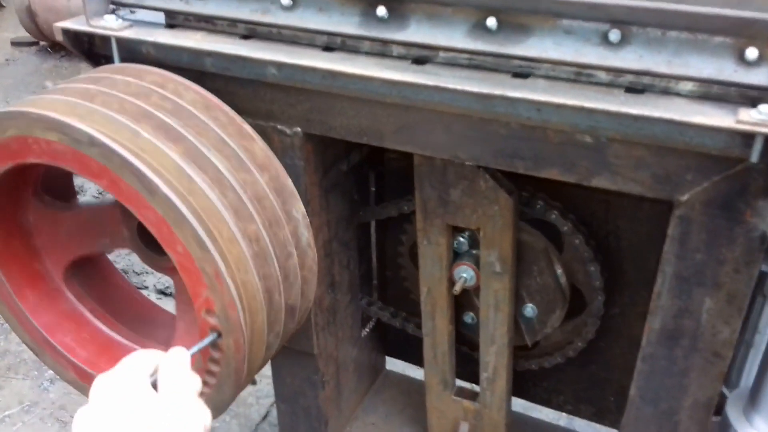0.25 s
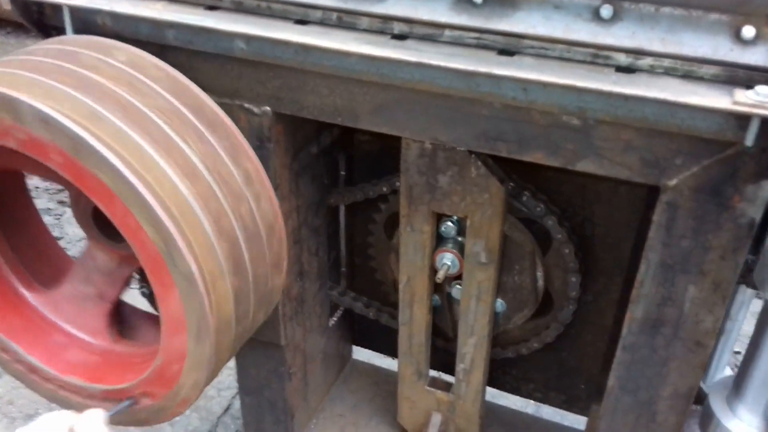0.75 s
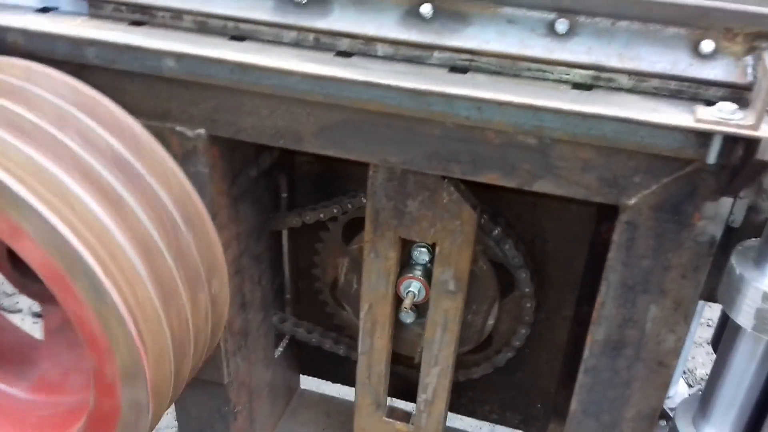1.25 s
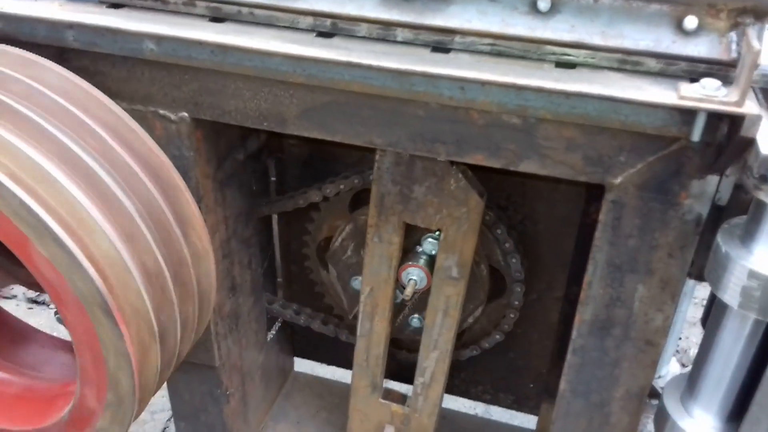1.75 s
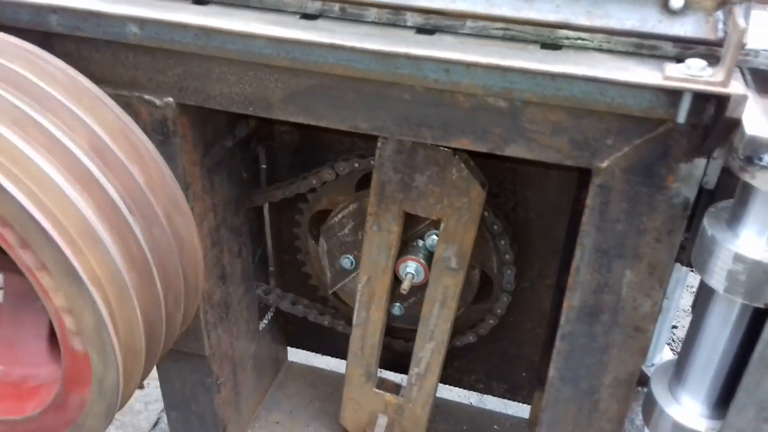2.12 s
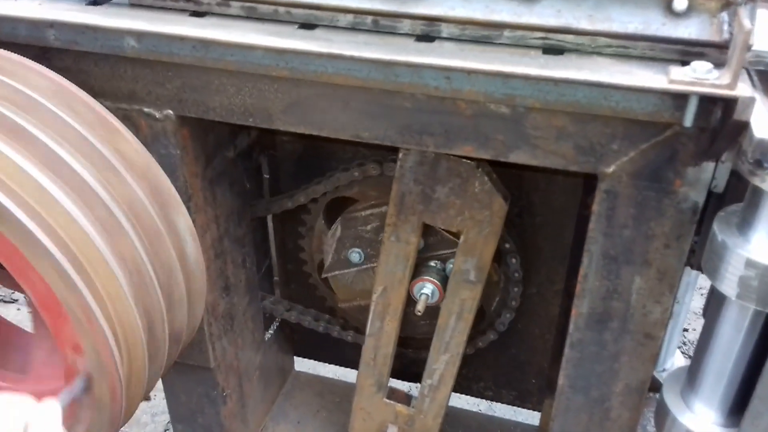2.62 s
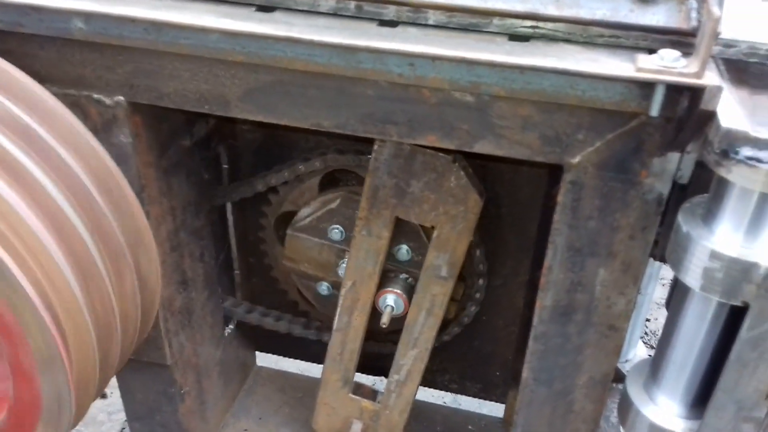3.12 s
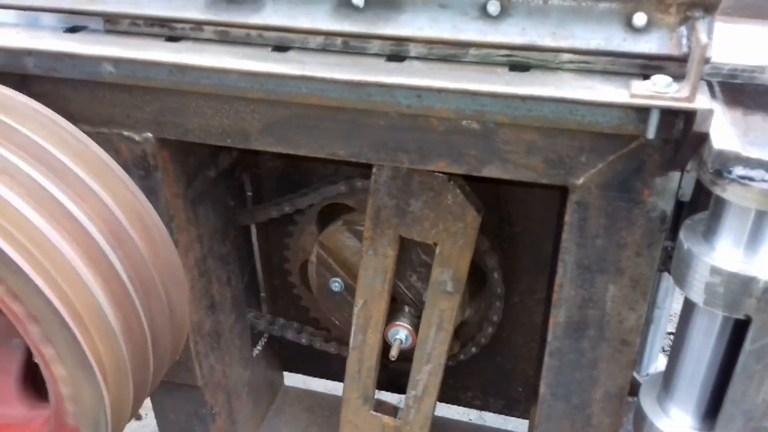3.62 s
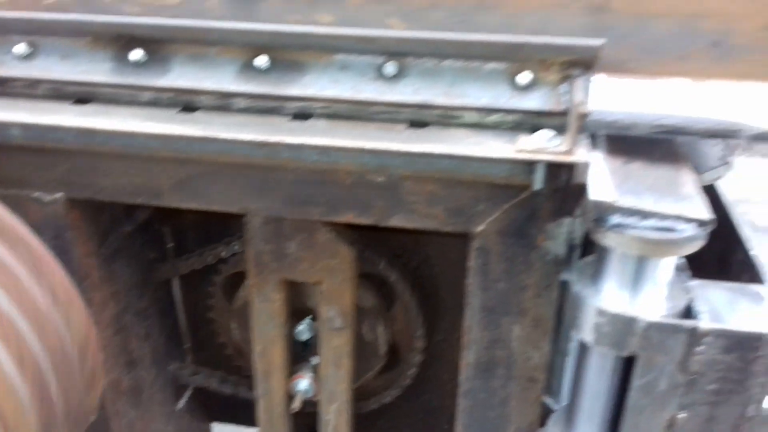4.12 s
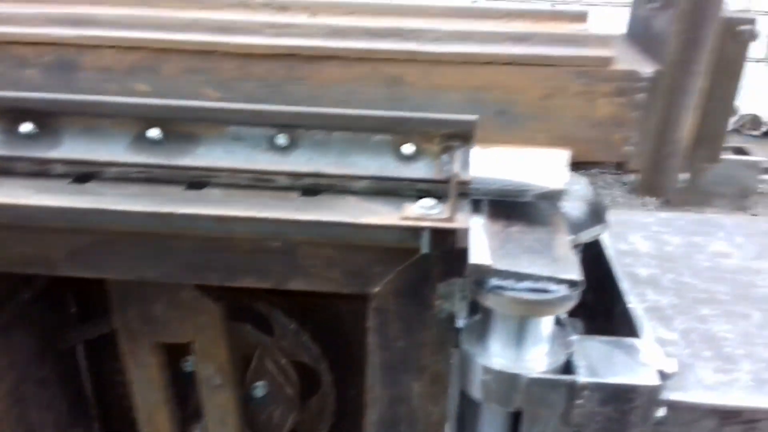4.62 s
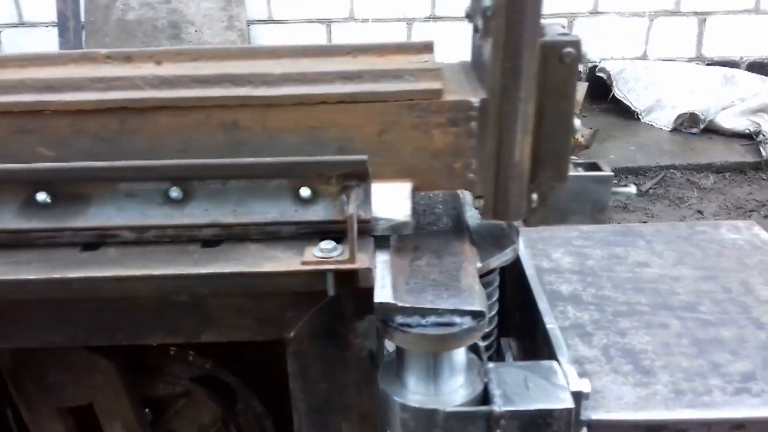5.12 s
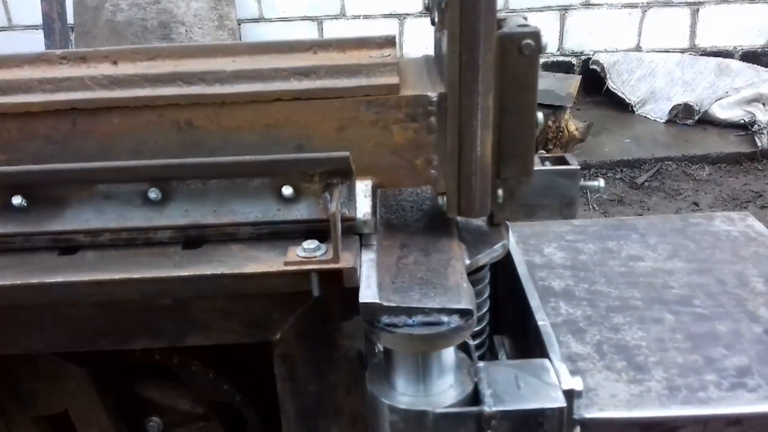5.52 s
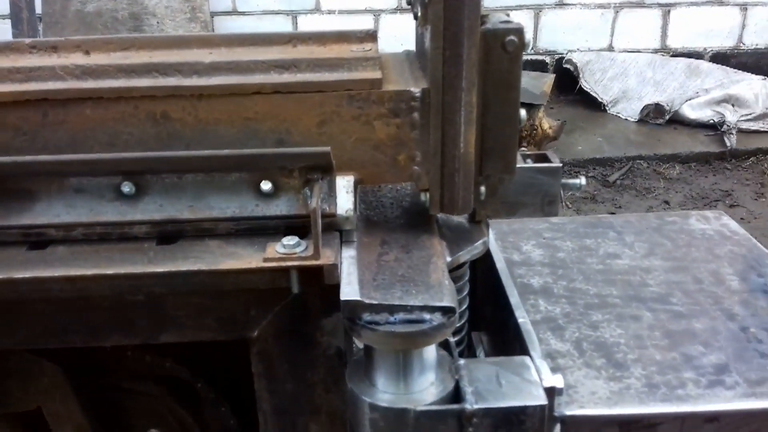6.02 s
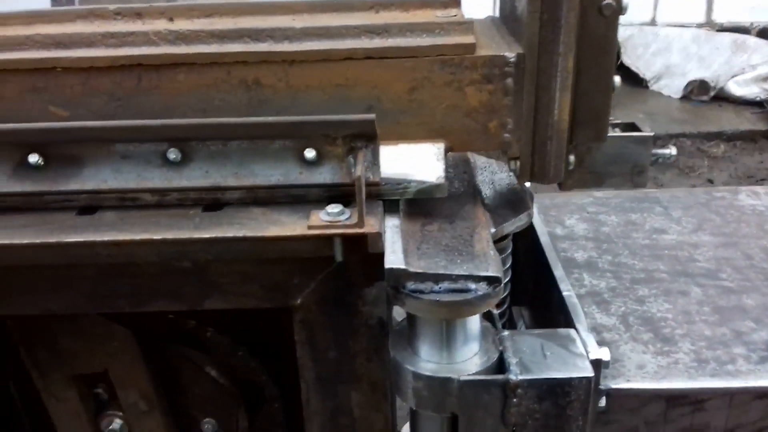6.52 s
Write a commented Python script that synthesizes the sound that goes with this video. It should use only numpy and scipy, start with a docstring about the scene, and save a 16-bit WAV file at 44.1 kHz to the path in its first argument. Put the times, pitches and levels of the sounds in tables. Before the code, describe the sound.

A hand-turned metal shaper in an open yard, heard close through a small, mid-range, essentially mono microphone. From 0 to 1 s there is only faint dry rasp, tiny knocks and light hiss. From 1 to 2.5 s chain and arm clacks become firmer and more frequent, and the hiss rises. At about 2.67 s a hard double knock with a dull low thud lands as the steel slide swells; grainy, ringing scraping continues with strong clacks near 2.9 and 3.05 s and very faint squeals until about 4.4 s. The scrape thins, almost stopping near 5.05 s, where a loose bar pings softly at 5.08 s. Quick dry ticks follow and scraping rebuilds. At 5.9 s one extremely loud, very short snap cracks, its pitch falling instantly. Scraping and spaced knocks continue to the cut at about 6.8 s, with slight wind bumps underneath.

```python
"""First heard is a faint dry rasp with soft knocks over hiss: a hand-turned metal shaper at work in a yard.
The ram slides on steel ways (noise of many small catches through resonators), chain rollers and the slotted
arm knock on the welded frame (short bursts exciting modes), and the base gives a few low, dull thuds.
Once a loose bar pings (decaying sines) and once the slack snaps tight (a falling pulse in a noise burst).
Faint squeals, wind and hiss lie behind, heard by a small mono microphone with a narrow mid-range voice."""
import sys
import numpy as np
from scipy import signal
from scipy.fft import rfft, irfft
from scipy.io import wavfile
from scipy.ndimage import uniform_filter1d

SR = 44100
rng = np.random.default_rng(int(sys.argv[2]) if len(sys.argv) > 2 else 0)


def master(y):
    """Save y as 16-bit WAV."""
    cut = np.clip(np.atleast_2d(y).T, -1, 1)
    pcm = np.round(cut * 32767)  # scale
    wavfile.write(sys.argv[1], SR, pcm.astype(np.int16))


N = 297979


def from_db(db):
    """Amplitude ratio: 20 dB is a factor of ten."""
    return 10 ** (np.asarray(db) / 20)


def rms_one(x):
    """Normalisation to unit root-mean-square amplitude."""
    return x / np.sqrt(np.mean(x ** 2) + 1e-20)


def in_time(rows):
    """Linear interpolation: each column of a curve table at every sample."""
    s, *columns = np.transpose(rows)
    return [np.interp(np.arange(N) / SR, s, column) for column in columns]


def drift(rate_hz):
    """Low-pass random fluctuation of unit rms, computed at every 40th sample and interpolated."""
    pole = np.exp(-80 * np.pi * rate_hz / SR)
    noise = rng.standard_normal(N // 40 + 2002)
    slow = signal.lfilter([1], [1, -2 * pole, pole * pole], noise)[2000:]   # drop the settling
    return np.interp(np.arange(N) / 40, np.arange(len(slow)), rms_one(slow))


def band(x, order, edges_hz, kind="low"):
    """Butterworth filtering: maximally flat in its passband."""
    return signal.sosfilt(signal.butter(order, edges_hz, kind, fs=SR, output="sos"), x)


def colour(x, spectrum, size=4096):
    """Minimum-phase filtering: the given spectrum with its energy as early as possible, at unit power."""
    hz, db = np.transpose(spectrum)
    bins_hz = np.arange(size // 2 + 1) * SR / size
    log_gain = np.log(from_db(np.interp(np.log(bins_hz + 1), np.log(hz), db)))
    cepstrum = irfft(log_gain)
    cepstrum[1:size // 2] *= 2   # folding the cepstrum makes the response causal
    cepstrum[size // 2 + 1:] = 0
    response = irfft(np.exp(rfft(cepstrum)))
    response = response / np.sqrt(np.sum(response ** 2))
    return signal.oaconvolve(np.atleast_2d(x), response[None], axes=1)[:, :np.shape(x)[-1]]


def ring(force, hz, t60):
    """Damped resonator: a unit click starts a decaying sine of initial height 1."""
    radius, angle = from_db(-60 / (t60 * SR)), 2 * np.pi * hz / SR
    feedback = [1, -2 * radius * np.cos(angle), radius * radius]
    return signal.lfilter([0, np.sin(angle)], feedback, force + 1e-18)


def click(s):
    """Unit impulse: excites all frequencies equally."""
    return 1. * (np.arange(N) == round(s * SR))


# the ram's travel: (time [s], level of the slide [dB], boost of its treble [dB])
RAM_TRAVEL = [(0, -55, 5), (.9, -57, 4.5), (1.22, -51, 5), (2.14, -50, 1.5), (2.2, -52, 1), (2.5, -55.5, 4),
              (2.62, -42.5, 5), (2.84, -46, 6), (3.25, -41.5, 4), (3.5, -41.5, 3), (3.93, -46.5, 6.5),
              (4.4, -44, 6.5), (4.74, -47, 4), (4.9, -54.5, 5), (5.07, -64.5, -5), (5.12, -50.5, 0),
              (5.25, -50, -2), (5.4, -46, 5), (5.76, -43.5, 6.5), (6.2, -42.5, 5.5), (6.51, -45, 4.5),
              (6.76, -44.5, 3.5)]
# balance of the slide: (time [s], ringing of the ram against the crackle [dB], boost of the low end [dB])
RAM_BALANCE = [(0, -8.5, 1.5), (1.5, -15, 2.5), (2.8, -16, 6.5), (3.2, -3, -7.5), (3.8, -2.5, -0.5),
               (4.4, -5.5, 5), (4.9, -10.5, 6.5), (5.4, -9, 0.5), (6, -11.5, 2), (6.76, -4.5, -1)]
# modes of the welded frame, rubbed and struck: (frequency [Hz], level [dB], t60 [s])
FRAME_MODES = [(623, -19, 0.069), (856, -23, 0.16), (1060, -11.5, 0.11), (1287, -9.5, 0.14),
               (1427, -12.5, 0.098), (1597, -12.5, 0.045), (1966, 2.5, 0.061), (2073, 3, 0.029),
               (2218, 0, 0.023), (2392, -13, 0.033), (2740, -13, 0.038), (2850, -2, 0.043),
               (3070, -15.5, 0.031), (3453, -8.5, 0.056), (3720, -21.5, 0.1), (4073, -17.5, 0.077),
               (4300, -25.5, 0.068)]
# modes of the ram, rubbed by the ways: (frequency [Hz], level [dB], t60 [s])
RAM_MODES = [(1689, -6, 0.11), (1965, -3.5, 0.065), (2347, -0.5, 0.082), (2404, -1.5, 0.066),
             (2655, 1, 0.064), (2736, -1, 0.076), (3485, -4, 0.038), (3747, -15, 0.043), (3967, -10, 0.05),
             (4100, -14, 0.058), (4660, -13.5, 0.016)]
# spectrum of steel scraping on steel: (frequency [Hz], density [dB per Hz])
SCRAPE_SPECTRUM = [(71, -65), (120, -34.5), (368, -22.5), (632, -9.5), (941, -9), (1010, -6), (1170, -7.5),
                   (1940, 4.5), (2410, 2), (2730, -4), (3040, -6), (3520, -7.5), (5530, -39.5),
                   (9000, -65.5), (11700, -48), (19800, -120)]
CATCHES_PER_S, CATCH_SPREAD_DB = 2600, 2.8   # grain of the slide
WANDER_DB = 5   # limit of a rubbed mode's swing in time


def rubbed_body(grit, modes):
    """Modal excitation by friction: each mode swells and fades as the contact point moves."""
    body = 0
    for hz, db, t60 in modes:
        gain = from_db(db + WANDER_DB * np.tanh(drift(7.2)))
        own_grit = np.roll(grit, rng.integers(N))   # keeps the modes out of step
        body = body + gain * ring(own_grit, hz, t60)
    return rms_one(body)


def slide():
    """Asperity friction: surface points catch in clumps, crackle, and keep frame and ram sounding."""
    level_db, treble_db = in_time(RAM_TRAVEL)
    ram_db, low_db = in_time(RAM_BALANCE)
    caught = rng.random(N) < CATCHES_PER_S / SR
    sizes = from_db(CATCH_SPREAD_DB * np.minimum(rng.exponential(1, N), 4))
    signs = rng.choice([-1, 1], N)
    clumps = from_db(1.06 * drift(6.0) + 0.96 * drift(30))
    grit = caught * sizes * signs * clumps
    crackle = rms_one(colour(grit, SCRAPE_SPECTRUM)[0])
    frame = rubbed_body(grit, FRAME_MODES)
    ram = rubbed_body(grit, RAM_MODES)
    # the more the ram rings, the less of the rubbing reaches the frame
    rubbing = rms_one(crackle + from_db(-11.0 - 0.42 * ram_db) * frame) + from_db(ram_db) * ram
    treble = band(rubbing, 2, 2900, "high")
    low = band(rubbing, 2, 560)
    return from_db(level_db) * (rubbing + (from_db(treble_db) - 1) * treble + (from_db(low_db) - 1) * low)


# chain and arm against the frame: (time [s], peak of the column modes [dB], base modes against them [dB],
# arm modes against them [dB], rail modes against them [dB], t60 of the rattle [s])
FRAME_KNOCKS = [(0.013, -56.5, 1, 7, 4, 0.026), (0.0366, -56.5, 9.5, -3, -8, 0.053),
                (.109, -57, -15, 7, -10, 0.023), (.1516, -53, -12, 8, -0.5, 0.038),
                (0.2208, -50.5, -5, -6, -18, 0.04), (0.3704, -45.5, -7.5, -1.5, -27, 0.064),
                (.59, -54, -16, 4, -9, 0.03), (0.78, -56.5, -23, 10, -10, 0.023),
                (0.9795, -44, -11, -12, -17, 0.057), (1.1077, -43, -14, -2, -9, 0.043),
                (1.1373, -44, -7, -8.5, -11, 0.036), (1.196, -45.5, 4, -2, -14, 0.029),
                (1.2948, -39.5, -5.5, -25, -27, 0.047), (1.3604, -40.5, -13, -6, -21, 0.026),
                (1.818, -34, -10.5, -11, -24, 0.056), (1.9362, -36, -8, -6.5, -28, 0.046),
                (2.0098, -37, -21, -10, -11, 0.029), (2.111, -30.5, -13.5, -15, -14.5, 0.06),
                (2.138, -42, -5, -18, -21, 0.045), (2.1492, -34.5, -9, -18, -26, 0.022),
                (2.2261, -39, -13, -11, -18, 0.074), (2.2513, -44, -6, -10, -8, 0.042),
                (2.278, -34, -17, 0.5, -4.5, 0.061), (2.321, -34.5, -24, -5.5, -13, 0.036),
                (2.374, -40.5, -8, -3.5, -24, 0.048), (2.404, -36.5, -8.5, -3.5, -31, 0.075),
                (2.4681, -36.5, -17, -4, -11, 0.041), (2.5064, -35.5, -16, -1, -2.5, 0.063),
                (2.56, -39, -11, -1.5, -3.5, 0.048), (2.6049, -35, -23, -9, -6, 0.065),
                (2.642, -32.5, -11.5, -3.5, -8, 0.088), (2.6688, -23.5, -3.5, -6, -15, 0.042),
                (2.6765, -25, -5, -6.5, -27, 0.04), (2.6894, -41.5, 8, -12, -21, 0.046),
                (2.705, -35, -8, -12, -18, 0.066), (2.7241, -37, -5.5, 2, -5.5, 0.043),
                (2.7702, -41.5, -10, -2, -1, 0.03), (2.782, -33.5, -22, -12, -22, 0.021),
                (2.804, -37.5, -15, 1, -8, 0.021), (2.886, -34.5, -17, -5, -1.5, 0.036),
                (2.897, -27.5, -11.5, -19, -14, .04), (2.9791, -32.5, -16.5, -8.5, -13, 0.15),
                (3.0551, -25, -15, -17, -18.5, 0.068), (3.1009, -37, -26, -24, -25, 0.051),
                (3.262, -36, -18, -3, -6, 0.049), (3.3091, -30.5, -21, -16, -11, 0.035),
                (3.48, -36, -28, -2, -26, 0.053), (3.502, -34.5, -20, -16, -25, 0.07),
                (3.6093, -39, -0.5, -13, -16, 0.031), (3.8352, -38.5, -10, -19, -24, 0.099),
                (4.147, -44.5, -2, -8, 2, 0.028), (4.3018, -42.5, 0, -11, -7, 0.031),
                (4.325, -41.5, -9, -2, 1, 0.038), (4.345, -31, -15.5, -20, -16, 0.03),
                (4.38, -54, 13, -14, -17, 0.042), (4.442, -40.5, -9, -5, -0.5, 0.032),
                (4.5592, -38.5, -2.5, -11, -16, 0.12), (4.665, -39, -18, -7, -22, 0.037),
                (4.765, -45, -5.5, 0, -12, 0.086), (4.8647, -45, -5, -12, -23, 0.031),
                (4.9553, -40, -8.5, -18, -20, 0.1), (5.047, -52.5, 4, -14, -18, 0.094),
                (5.138, -44, -6, -8, -14, 0.022), (5.145, -39, -14, 1, -24, 0.045),
                (5.172, -33.5, -21, -15, -6, 0.03), (5.184, -34, -22, -20, -9, 0.014),
                (5.2092, -39, -22, -15, -9, 0.035), (5.266, -35, -24, -4.5, -32, 0.03),
                (5.352, -32.5, -14.5, -11, 1.5, 0.033), (5.3985, -31.5, -20, -10, -8, 0.034),
                (5.4828, -32.5, -29, -29, -6, 0.067), (5.538, -43, -8, -10, 0, 0.03),
                (5.5694, -36, -16, -10, -5, 0.086), (5.657, -32.5, -20, -20, -4, 0.063),
                (5.741, -34.5, -30, -21, -2.5, 0.048), (5.8037, -43, 3.5, -14, -19, 0.058),
                (6.198, -38.5, 0.5, -16, -17, 0.065), (6.396, -34, -13.5, -21, -20, 0.041),
                (6.502, -30.5, -15.5, -22, -28, 0.072), (6.6047, -31.5, -6, -26, -30, 0.039),
                (6.7126, -28.5, -11, -14, -13, 0.053)]
# spectrum of the contact crack: (frequency [Hz], density [dB per Hz])
CRACK_SPECTRUM = [(30, -66), (120, -49), (400, -4), (1000, 3.5), (2000, -8), (3200, 0.5), (4200, -0.5),
                  (6000, -32), (9000, -47), (16000, -92)]
# edges between base, column, arm and rail modes: (frequency [Hz])
FAMILY_EDGES = [250, 1500, 2500, 3200, 6500]
FIRST_TOUCH_DB, CRACK_DB = 13, 20.5   # first contact against the rattle; crack against the modes
BLOW_SPREAD_DB = 3   # random spread of a mode from blow to blow
ATTACK_SHARE = 0.043   # rise of the rattle as a share of its t60


def knocks(size=6000):
    """Impact excitation: a first touch and a short rattle give a crack and set the frame modes ringing."""
    s, column_db, base_db, arm_db, rail_db, rattle_t60 = np.transpose(FRAME_KNOCKS)
    t = np.arange(size) / SR
    rattle_t60 = np.clip(rattle_t60, .004, .2)[:, None]
    decay = from_db(-60 * t / rattle_t60)
    attack = np.minimum(t / (ATTACK_SHARE * rattle_t60), 1)
    force = rng.standard_normal((len(s), size)) * decay * attack
    force[:, 0] = from_db(FIRST_TOUCH_DB)
    sound = from_db(CRACK_DB) * colour(force, CRACK_SPECTRUM)
    for hz, db, t60 in FRAME_MODES:
        strength_db = db + BLOW_SPREAD_DB * rng.standard_normal((len(s), 1))
        sound += from_db(strength_db) * ring(force, hz, t60)
    # where a blow lands decides how hard each family of modes speaks; neighbouring families are summed with
    # opposite sign so they join without a gap at their shared edge
    blows = 0
    for low, high, db in zip(FAMILY_EDGES, FAMILY_EDGES[1:], (base_db, 0, arm_db, rail_db)):
        family = band(sound, 2, [low, high], "band")
        height = np.sqrt(2 * uniform_filter1d(family ** 2, size=66).max(axis=1))
        blows = -blows + family * (from_db(column_db + db) / height)[:, None]
    out = np.zeros(N + size)
    for at, blow in zip(np.round(s * SR).astype(int), blows):
        out[at:at + size] += blow
    return out[:N]


# a few low, dull thuds of the base, some along with knocks: (time [s], level [dB], frequency [Hz])
BASE_THUDS = [(1.198, -41, 664), (2.669, -42.5, 261), (2.672, -38.5, 410), (4.379, -57, 325),
              (4.559, -42, 580), (5.969, -43.5, 530)]
THUD_CYCLES = 18   # cycles in which a thud falls by 60 dB


def base_thuds():
    """Single-mode resonance: a soft push sets one low mode going."""
    out = 0
    for s, db, hz in BASE_THUDS:
        push = band(click(s), 2, [110, 900], "band")
        out = out + from_db(db) * ring(push, hz, THUD_CYCLES / hz)
    return out


# spectrum of the short burst of noise around the snap: (frequency [Hz], density [dB per Hz])
NOISE_BURST_SPECTRUM = [(30, -57), (150, -47), (400, -7), (800, 3), (3000, 5.5), (3800, -10), (6000, -21.5),
                        (16000, -95)]
NOISE_BURST_START_S, NOISE_BURST_END_S, NOISE_BURST_DB = 5.8935, 5.906, -14.5
SNAP_S, SNAP_HZ, SNAP_DB = 5.89875, 3000, -1.2   # start, first pitch, level of the pulse
SNAP_FALL_S, SNAP_FADE_S = .0008, .000215   # time constants of pitch and level
THUMP_HZ, THUMP_DB, THUMP_T60_S = 524, -17.5, 0.014   # the dry low end


def snap():
    """Bending-wave dispersion: treble arrives first and bass last, within a short burst of noise."""
    t = np.maximum(np.arange(N) / SR - SNAP_S, 0)
    turns = SNAP_HZ * SNAP_FALL_S * (1 - np.exp(-t / SNAP_FALL_S))
    edge = -t ** 1.5 * np.exp(-t / SNAP_FADE_S) * np.sin(2 * np.pi * turns)
    edge = band(band(edge, 4, 4000), 2, 120, "high")
    thump = from_db(THUMP_DB) * ring(click(SNAP_S + SNAP_FALL_S), THUMP_HZ, THUMP_T60_S)
    thump = band(thump, 2, 150, "high")
    through = (np.arange(N) / SR - NOISE_BURST_START_S) / (NOISE_BURST_END_S - NOISE_BURST_START_S)
    through = np.clip(through, 0, 1)
    noise = np.sqrt(through) * (1 - through) ** 1.43 * rng.standard_normal(N)
    noise_burst = from_db(NOISE_BURST_DB) * colour(noise, NOISE_BURST_SPECTRUM)[0]
    return from_db(SNAP_DB) * edge / edge.max() + thump + noise_burst


# modes of a loose bar struck once: (frequency [Hz], relative level [dB], t60 [s])
BAR_MODES = [(1507, 12, 0.43), (2950, -1, 0.17), (3840, 2, 0.4)]
# the dry tick of the blow itself: (frequency [Hz], relative level [dB], t60 [s])
TICK_MODES = [(2100, 15, .026), (2480, 13, .014)]
PING_S, PING_DB = 5.082, -49   # moment of the blow; gain of tick and bar together
REBOUND_S, REBOUND_DB = .0025, 7   # second tick: delay, level against the first


def ping():
    """Free vibration: a blow too soft for treble and too small for bass ticks twice; the bar rings on."""
    blow = band(click(PING_S), 3, [1100, 4300], "band")
    tick = sum(from_db(db) * ring(blow, hz, t60) for hz, db, t60 in TICK_MODES)
    tick = tick + from_db(REBOUND_DB) * np.roll(tick, round(REBOUND_S * SR))
    bar = sum(from_db(db) * ring(blow, hz, t60) for hz, db, t60 in BAR_MODES)
    return from_db(PING_DB) * (tick + bar)


# faint squeals of the ways: (start [s], end [s], first pitch [Hz], last pitch [Hz], width [Hz], level [dB])
WAY_SQUEALS = [(3.75, 4.45, 7000, 7200, 220, -79.5), (2.9, 3.9, 9870, 9870, 180, -84),
               (3.25, 3.95, 4700, 4500, 130, -69), (3.3, 3.75, 5050, 5050, 220, -75)]


def squeals():
    """Narrow-band noise: slow fluctuations modulate a steady or gliding carrier that swells and fades."""
    out, t = 0, np.arange(N) / SR
    for start, end, from_hz, to_hz, width_hz, db in WAY_SQUEALS:
        through = np.clip((t - start) / (end - start), 0, 1)
        phase = 2 * np.pi * np.cumsum(from_hz + (to_hz - from_hz) * through) / SR
        tone = drift(width_hz) * np.cos(phase) + drift(width_hz) * np.sin(phase)
        out = out + from_db(db + 2.3 * drift(5.8)) * tone * np.sin(np.pi * through)
    return out


# spectrum of the wind: (frequency [Hz], density [dB per Hz])
WIND_SPECTRUM = [(15, -4), (40, -18.5), (90, 0), (140, -4.5), (260, -21.5), (600, -32), (2000, -75)]
# wind rumble: (time [s], level [dB])
WIND_RUMBLE = [(0, -94), (.8, -89), (1.3, -84), (2.1, -81), (3, -78), (3.7, -101), (4.2, -91), (4.7, -81),
               (5.3, -82), (6, -94), (6.76, -86)]
# low bumps on the microphone port: (middle [s], level [dB])
PORT_BUMPS = [(.864, -67), (1.12, -72), (1.192, -63.5), (1.262, -69.5), (1.37, -68), (1.973, -76),
              (2.68, -82), (2.78, -66), (2.873, -69), (3.065, -77), (4.76, -69), (4.83, -61.5),
              (4.875, -62), (5.243, -65.5), (5.337, -66.5), (5.84, -62)]
BUMP_S, PORTS_DIFFER_DB = 0.035, -33   # length of a bump; what of the wind the channels do not share


def wind():
    """Turbulent pressure: low noise comes and goes and bumps the port, a little different left and right."""
    shared, own = colour(rng.standard_normal((2, N)), WIND_SPECTRUM)
    t = np.arange(N) / SR
    gain = from_db(in_time(WIND_RUMBLE)[0] + 2.0 * drift(7.0))
    for s, db in PORT_BUMPS:
        inside = np.abs(t - s) < BUMP_S / 2
        swell = np.hanning(inside.sum())
        gain[inside] += from_db(db) * swell / np.sqrt(np.mean((swell * shared[inside]) ** 2))
    return gain * (shared + from_db(PORTS_DIFFER_DB) * own * [[1], [-1]])


# the channels' own noise: (time [s], level [dB])
HISS_LEVEL = [(0.0, -75), (0.85, -76.5), (1.58, -66.5), (6.76, -67.5)]
# spectrum of the hiss: (frequency [Hz], density [dB per Hz])
HISS_SPECTRUM = [(30, -6.5), (300, 10.5), (1000, 13), (4000, 8.5), (6000, 4.5), (10000, 2), (16000, 3)]


def hiss():
    """Random noise: independent in each channel, so the two do not correlate."""
    level_db, = in_time(HISS_LEVEL)
    return from_db(level_db) * colour(rng.standard_normal((2, N)), HISS_SPECTRUM)


def scene():
    """Superposition: one microphone feeds both channels; only wind and hiss differ."""
    machine = slide() + knocks() + base_thuds() + snap() + ping() + squeals()
    return machine + wind() + hiss()


OFFSET, CUTOFF_HZ = -.0006, 16100   # constant added to the signal (full scale 1); start of the stopband


def record(dry):
    """Band limiting: a steep low-pass cuts the top, and a slight constant offset is added."""
    return OFFSET + signal.sosfilt(signal.cheby2(16, 60, CUTOFF_HZ, fs=SR, output="sos"), dry)


dry = scene()
out = record(dry)
master(out)
```